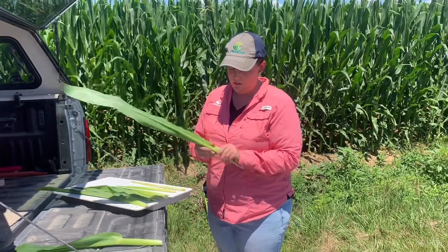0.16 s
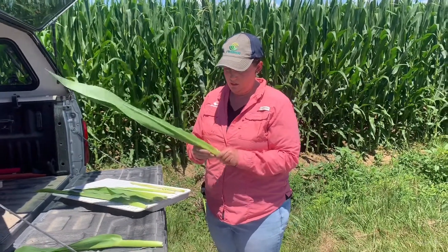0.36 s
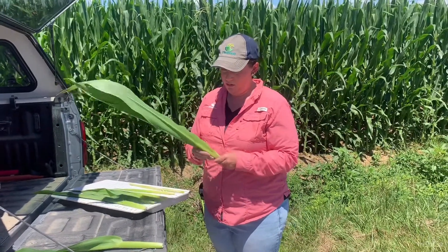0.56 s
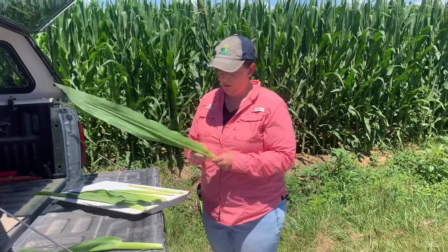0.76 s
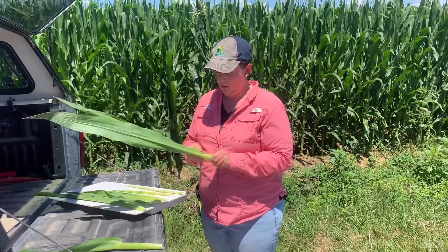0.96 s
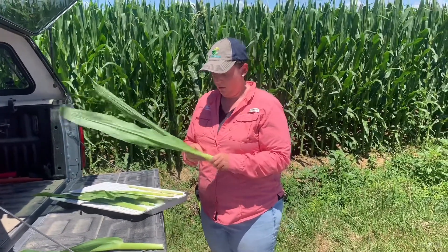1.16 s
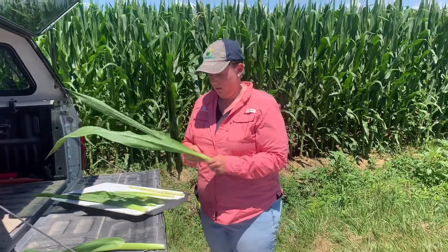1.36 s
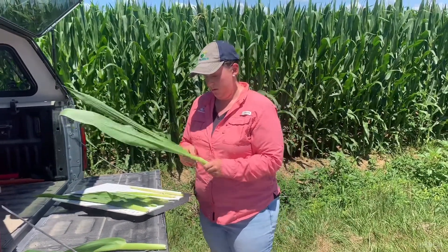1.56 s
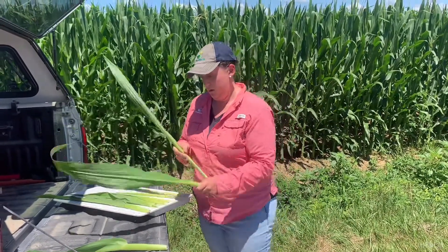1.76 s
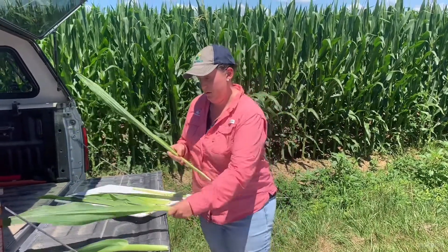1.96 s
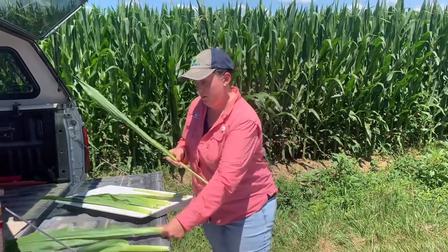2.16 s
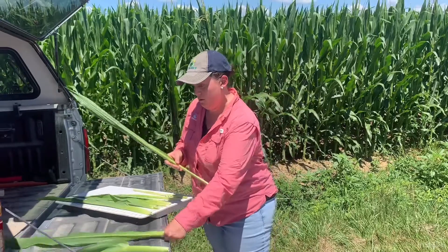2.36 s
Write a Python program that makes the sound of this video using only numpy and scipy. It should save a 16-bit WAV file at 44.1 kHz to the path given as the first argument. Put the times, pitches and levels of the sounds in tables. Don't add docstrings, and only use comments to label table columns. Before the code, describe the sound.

Large green leaves are peeled apart by hand close to the microphone, with sharp snaps, crackles and rustling; early knocks bump the camera, a stem drags late, and low wind rumbles in an open field.

```python
import sys
import numpy as np
from scipy import signal
from scipy.fft import rfft, irfft, next_fast_len
from scipy.io import wavfile
from scipy.ndimage import uniform_filter1d

SR = 44100
rng = np.random.default_rng(int(sys.argv[2]) if len(sys.argv) > 2 else 0)


def wrap_up_sound(samples):
    columns = np.atleast_2d(samples).T
    tamed = np.clip(columns, -1, 1)
    steps = np.round(tamed * 32767).astype(np.int16)
    wavfile.write(sys.argv[1], SR, steps)


N = 110250


def gain_of(db):
    return 10 ** (np.asarray(db) / 20)


def evened(x):
    return x / np.sqrt(np.mean(x ** 2) + 1e-20)


def read(points, hz):
    f, value = np.transpose(points)
    return np.interp(np.log(hz + 1), np.log(f + 1), value)


def shaped(x, gain):
    size = next_fast_len(x.shape[-1] + 8192)
    spectrum = rfft(x, size) * gain(np.fft.rfftfreq(size, 1 / SR))
    return irfft(spectrum, size)[..., :x.shape[-1]]


def ring(x, hz, width_hz):
    return signal.lfilter(*signal.iirpeak(hz, hz / width_hz, SR), x)


def curve(table, column):
    rows = np.array(table)
    return np.interp(np.arange(N) / SR, rows[:, 0], rows[:, column])


def patchy(table, patch_db):
    frames, hz = N // 128 + 6, np.fft.rfftfreq(512, 1 / SR)
    z = rng.standard_normal((5, frames, 257))
    patches = evened(uniform_filter1d(uniform_filter1d(z[4], 14, 0), 6, 1))
    field = (z[:2] + 1j * z[2:4]) * gain_of(read(table, hz) + patch_db * patches)
    noise = signal.istft(field.transpose(0, 2, 1), nperseg=512, noverlap=384)[1]
    return evened(noise[:, :N])


# freq_hz, turn_rad
PORT_TURN = [(100, -2), (2450, 0.48), (3250, -5), (4300, -7), (5350, -2.5), (6600, 1.5), (7600, 3),
             (9000, 8)]
# freq_hz, balance_db
PORT_BALANCE = [(200, 0), (2000, -1), (5000, 2), (7000, -5), (8400, -16.5), (9500, -20.5)]


def ports(x, loose):
    left = shaped(x[0], lambda f: gain_of(read(PORT_BALANCE, f)) * np.exp(1j * read(PORT_TURN, f)))
    return np.array([left + loose * x[1], x[0] - loose * x[1]])


# start_s, peak_db, leaf_ring_hz, treble_db, burst_t60_s
SNAPS = [(.002, -52.5, 1790, 1, 0.05), (.045, -55.5, 1830, 3, 0.14), (0.198, -51, 2020, -16, 0.49),
         (.251, -38.5, 2170, 0.5, 0.017), (0.259, -50.5, 2370, 0.5, 0.019), (0.275, -42.5, 2260, 0, 0.018),
         (0.281, -40, 1800, -2.5, 0.042), (0.29, -51, 2280, 8, 0.03), (0.4002, -34.5, 1690, -4.5, 0.048),
         (0.41, -55.5, 2100, 9, 0.18), (0.617, -45.5, 1040, -27, .018), (0.633, -43.5, 1010, -13.5, 0.042),
         (0.809, -53, 1500, -4.5, 0.13), (0.955, -54, 1530, -26, 0.015), (0.962, -50, 1490, -30, 0.042),
         (0.9834, -31, 1594, 0, 0.014), (0.991, -45, 1550, 8.5, 0.11), (1.0545, -52.5, 2310, 6.5, 0.1),
         (1.52, -54, 1590, 0.5, 0.093), (1.58, -55, 1570, 10.5, 0.083), (2.083, -44.5, 1410, -42, 0.019),
         (.602, -56.5, 1480, -6.5, 0.045),
    (0.855, -52.5, 1650, -3, 0.13),
    (1.009, -54, 1700, 9, 0.24),
    (1.799, -64, 900, 8.5, 0.047),
    (1.912, -61, 1160, 1.5, 0.16),
    (2.088, -43, 1050, -17, 0.025),
    (2.452, -57.5, 2350, -6, 0.041),
]
# freq_hz, width_hz, level_db
LEAF_MODES = [(2510, 460, 17), (3050, 1550, 10), (4400, 730, -31), (5750, 340, -48), (7850, 4100, 15.5)]


def snaps():
    length = 8000
    clicks_per_s, rise_s, first_click = 1500, 0.00046, 2
    tail_db, tail_t60_s = -12.5, 0.082
    ring_width_hz, body_db = 380, -7
    out, t = np.zeros((2, N + length)), np.arange(length) / SR
    for start_s, peak_db, hz, treble_db, t60_s in SNAPS:
        z = rng.standard_normal((4, length))
        struck = rng.random((2, length)) < clicks_per_s / SR
        clicks = z[:2] * (0.21 + struck) * np.minimum(t / rise_s, 1)
        clicks[0, [8, 30]] = -first_click / 2, first_click
        burst = clicks * gain_of(-60 * t / max(t60_s, .005))
        drive = burst + 0.71 * z[2:] * gain_of(tail_db - 60 * t / tail_t60_s)

        low = ring(ring(drive, hz, ring_width_hz), hz, 890)
        low = low + gain_of(body_db) * ring(drive, 1.02 * hz, 2.15 * hz)
        low = ring(ring(low, 0.85 * hz, hz), 0.85 * hz, hz)

        drive = np.roll(np.clip(drive, -1.6, 1.6), 70, axis=1)
        high = np.zeros_like(drive)
        for k, (mode_hz, width_hz, mode_db) in enumerate(LEAF_MODES):
            mode = ring(ring(drive, mode_hz, width_hz), mode_hz, 2 * width_hz)
            high += (-1) ** k * gain_of(mode_db) * mode

        mix = low / abs(low).max() + gain_of(treble_db) * high / abs(high).max()
        out[:, round((start_s - .0008) * SR):][:, :length] += gain_of(peak_db) * mix
    return ports(out[:, :N], loose=0.29) + 0.32 * out[1, :N]


# start_s, peak_db, pitch_hz, t60_s
POPS = [(.0005, -50, 1710, 0.016), (.059, -67, 4400, .01), (.0765, -43, 1670, 0.011),
        (.077, -60.5, 4250, 0.011), (.9845, -28.5, 1625, 0.016), (0.251, -41, 1460, 0.022),
        (.2915, -45, 2600, .02), (.402, -47, 453, 0.056), (.403, -48.5, 912, .04),
        (0.403, -49, 4610, 0.021), (0.403, -51.5, 3370, 0.041), (.4055, -46.5, 2410, 0.025),
        (.412, -50, 4500, 0.018), (.425, -60, 4400, 0.08), (.6185, -55.5, 2310, 0.016),
        (0.62, -57.5, 3560, 0.013), (.635, -53, 3560, 0.012), (.6395, -55.5, 3510, 0.034),
        (.638, -60.5, 4400, 0.026), (.641, -58.5, 2240, 0.048), (.679, -70, 3530, 0.3),
        (.7, -60.5, 1585, 0.17), (0.721, -54, 1546, 0.036), (.811, -53.5, 2210, 0.013),
        (.858, -51.5, 4820, 0.0076), (0.865, -57, 4160, 0.014), (0.973, -59, 5820, 0.063),
        (0.9832, -33.5, 4510, 0.0097), (.9845, -39.5, 3360, 0.014), (0.984, -39, 2513, 0.023),
        (0.988, -44, 5830, .03), (0.999, -44, 3530, 0.016), (.998, -47, 2380, 0.014),
        (1.005, -45, 3600, 0.018), (1.009, -46, 2430, .015), (1.009, -44, 1660, 0.023),
        (1.018, -46.5, 1720, 0.016), (1.0552, -47.5, 2400, 0.012), (1.059, -54, 6520, 0.033),
        (1.513, -62, 1606, 0.052), (1.516, -57.5, 2290, 0.022), (1.522, -56, 6460, 0.022),
        (1.524, -51.5, 8030, 0.046), (1.522, -55.5, 2310, .03), (1.527, -48, 1560, 0.017),
        (1.55, -59, 1685, 0.041), (1.579, -58.5, 4820, .02), (1.579, -58, 2380, 0.039),
        (1.582, -58.5, 1124, 0.043), (2.0844, -48, 1533, .02)]


def pops():
    length, rise_s, roughness = 5000, 0.00076, 0.53
    out, t = np.zeros((2, N + length)), np.arange(length) / SR
    for start_s, peak_db, hz, t60_s in POPS:
        shake = evened(uniform_filter1d(rng.standard_normal((4, length)), 70, axis=1))
        wobble = np.array([[1], [0]]) + roughness * (shake[:2] + 1j * shake[2:])
        tone = (wobble * np.exp(2j * np.pi * hz * t)).imag
        start = max(round((start_s - SMEAR_CYCLES / hz) * SR), 0)
        envelope = np.minimum(t / rise_s, 1) * gain_of(peak_db - 60 * t / max(t60_s, .004))
        out[:, start:start + length] += tone * envelope
    return ports(out[:, :N], loose=0.73)


# time_s, level_db, treble_db
RUB = [(0, -64.5, 4), (.1, -66.5, 5), (.19, -67.5, 0), (.42, -64, 0.5), (.56, -87.5, 11), (.62, -68, -3),
       (.72, -64.5, 6.5), (.9, -68.5, 5.5), (1.0, -58.5, 7.5), (1.13, -77, 9.5), (1.45, -80.5, 3),
       (1.53, -71, 14), (1.7, -70.5, -0.5), (2.06, -74, 3.5), (2.11, -63.5, 3), (2.25, -61, -5.5),
       (2.38, -68, -1), (2.5, -60, -30)]
# time_s, level_db
GRIP = [(0, 4.5), (.9, -2), (1.0, 2.5), (1.2, -2), (1.75, 3.5), (2.5, -9)]
# freq_hz, level_db
RUB_LOW = [(170, 6), (350, 2), (650, -12.5), (950, -0.5), (1650, -4.5), (1900, -10.5), (2150, -33),
           (3000, -37)]
# freq_hz, level_db
RUB_HIGH = [(2350, -13), (2900, -10.5), (3500, -20.5), (4400, -16), (5000, -17), (6300, -16.5),
            (7600, -18.5), (8350, -10.5)]


def rustle():
    drift = evened(uniform_filter1d(rng.standard_normal(N), 300))
    grains = np.minimum(rng.exponential(1, N // 40 + 1), 4).repeat(40)[:N]
    clumps = gain_of(1.5 * drift + 1.5 * grains)
    low = patchy([(60, -48)] + RUB_LOW + [(4000, -77)], patch_db=3)
    low = low + (gain_of(curve(GRIP, column=1)) - 1) * ring(low, 320, 500)
    high = patchy([(1600, -28.5)] + RUB_HIGH + [(9300, -30), (9800, -66)], patch_db=0)
    treble = gain_of(-13.0 + curve(RUB, column=2))
    mix = evened(low * clumps) + treble * evened(high * clumps)
    return ports(mix * gain_of(curve(RUB, column=1)), loose=0.27)


# freq_hz, level_db
SWISH = [(1900, -18), (2300, -21), (2650, -12.5), (3300, -8), (4100, -0.5), (4600, -7), (5000, -26),
         (6500, -14), ]


def swish():
    start_s, swell_s, level_db = 2.452, .03, -56
    u = (np.arange(N) / SR - start_s) / swell_s
    top = [(7600, -13), (8400, -3.5), (9300, -16), (9800, -68)]
    hiss = patchy(SWISH + top, patch_db=0)
    return ports(hiss * (u > 0) * gain_of(level_db - 16 * np.clip(1 - u, 0, 1)), loose=.3)


# start_s, level_db, dullness_hz, edge_db, thinness_hz
KNOCKS = [
    (0.2166, -1, 6400, 1, 30),
    (0.2336, -6.5, 20000, 3, 24),
    (.3600, -15.5, 1700, -0.5, 317),
    (0.37, -4, 131, 1, 29),
    (.236, 1.5, 84, -17, 26),
]
# freq_hz, level_db
PUSH = [(50, 16), (130, 22.5), (260, 21), (450, 19), (700, 9), (1100, -1), (1600, -69), (2500, -35)]
# freq_hz, level_db
EDGE = [(500, -36), (1400, 1.5), (2300, -2.5), (3200, -29.5), (4500, -48), (6400, -22), (8000, -43.5),
        (9500, -49)]
# freq_hz, level_db
RIGHT_EDGE = [(1000, -17), (2000, -21), (3200, 11), (8000, 12.5)]


def knocks():
    right_lead_s, right_turn_rad = 0.00021, -1.25
    out = np.zeros((2, N))
    for start_s, level_db, dull_hz, edge_db, thin_hz in KNOCKS:
        def body(f):
            right_db = np.array([f * 0, read(RIGHT_EDGE, f)])
            right_rad = np.array([f * 0, right_turn_rad + 2 * np.pi * f * right_lead_s])
            push = gain_of(read(PUSH, f)) * np.exp(1j * right_rad)
            edge = gain_of(read(EDGE, f) + edge_db + right_db)
            return (push + edge) / (1 + (f / dull_hz) ** 3) / (1 + (thin_hz / (f + 1)) ** 3)

        pulse = gain_of(level_db) * (np.arange(N) == round(start_s * SR))
        out += shaped(pulse, body)
    return out


def drag():
    start_s, length_s, pitch_hz, level_db = 2.088, .046, 385, -55
    u = np.clip((np.arange(N) / SR - start_s) / length_s, 0, 1)
    rough = 1 + 0.96 * evened(ring(ring(rng.standard_normal(N), 58, 90), 58, 90))
    groan = np.sin(2 * np.pi * np.cumsum(pitch_hz * (1 - 0.14 * u)) / SR)
    return gain_of(level_db) * rough * np.sin(np.pi * u) ** 0.15 * groan


# freq_hz, level_db_per_hz
WIND = [(12, -47), (20, -14), (47, 2), (64, 4), (108, -10.5), (125, -14), (200, -30), (260, -56),
        (440, -120)]
# time_s, level_db
GUSTS = [(0.108, -50), (.3, -53), (0.498, -60.5), (0.758, -55.5), (0.872, -51), (1.02, -58), (1.268, -49),
         (1.519, -55), (1.968, -52), (2.198, -53.5), (2.449, -56.5)]


def wind():
    gust_s, lead_s, calm_db = .035, 0.018, -58
    z = shaped(rng.standard_normal((2, N)), lambda f: gain_of(read(WIND, f)))
    z = evened(np.array([z[0] + 0.5 * z[1], z[0] - 0.43 * z[1]]))
    swell = uniform_filter1d(uniform_filter1d((z ** 2).mean(0), 2600), 2600)
    level = np.full(N, gain_of(calm_db))
    for time_s, gust_db in GUSTS:
        level += gain_of(gust_db) * np.exp(-((np.arange(N) / SR - time_s + lead_s) / gust_s) ** 2)
    return evened(z / (swell + 0.054) ** .4) * level


# freq_hz, level_db_per_hz
AIR = [(130, -15.5), (266, -13), (684, -25), (1580, -19), (2200, -30.5), (7500, -38), (8300, -22),
       (9300, -47)]


def air():
    return gain_of(-75) * ports(patchy(AIR, patch_db=3), loose=0.42)


def scene():
    return snaps() + pops() + rustle() + swish() + knocks() + drag() + wind() + air()


SMEAR_CYCLES = 1.75


def low_pass(x):
    return signal.sosfilt(signal.butter(12, 13000, fs=SR, output="sos"), x)


def record(dry):
    turn_rad, low_hz, edge_hz = 1.9, 25, 9080

    def network(f):
        phase = turn_rad - 2 * np.pi * SMEAR_CYCLES * np.log((f + low_hz) / 10000)
        return np.exp(1j * phase) / (1 + (f / edge_hz) ** 30)

    def noise_band(f):
        return 1 / (1 + (f / 12400) ** 24) / (1 + (8500 / (f + 1)) ** 10)

    wet = shaped(dry, network)
    z = shaped(rng.standard_normal(dry.shape), noise_band)
    hiss = gain_of(-84.5) * np.array([z[0] + 2 * z[1], z[0] - 2 * z[1]])
    return low_pass(wet + hiss)


dry = scene()
out = record(dry)
wrap_up_sound(out)
```